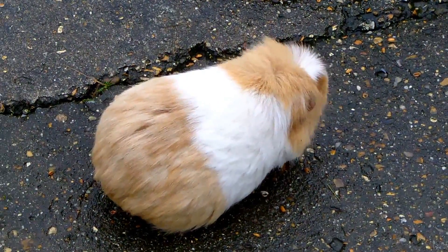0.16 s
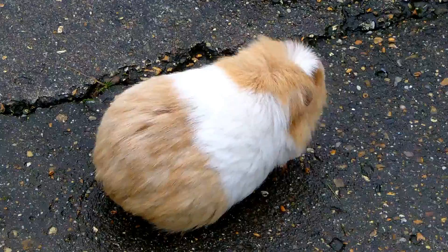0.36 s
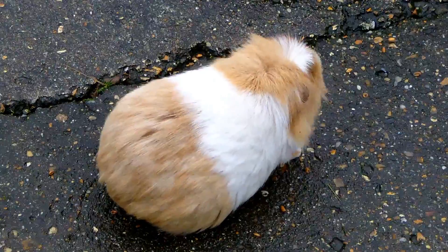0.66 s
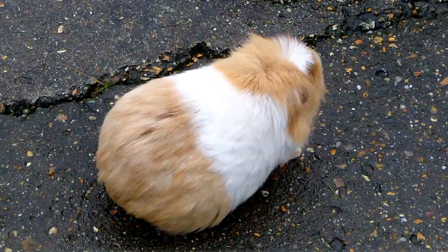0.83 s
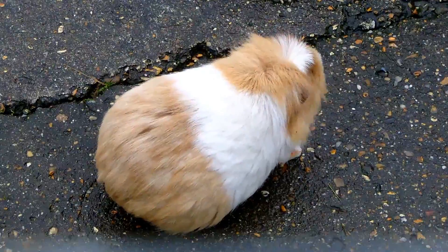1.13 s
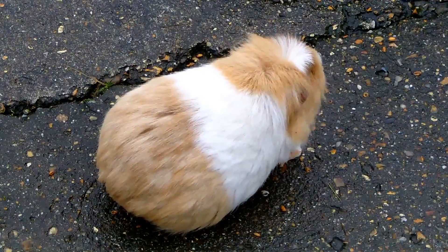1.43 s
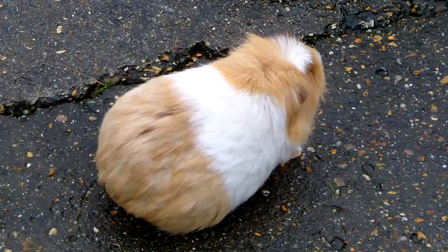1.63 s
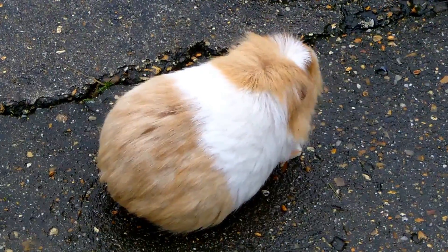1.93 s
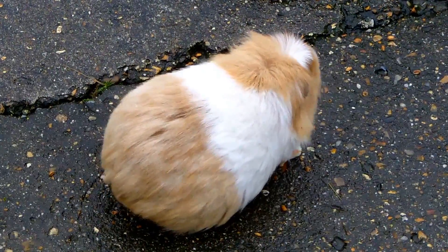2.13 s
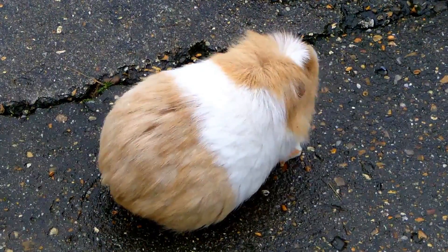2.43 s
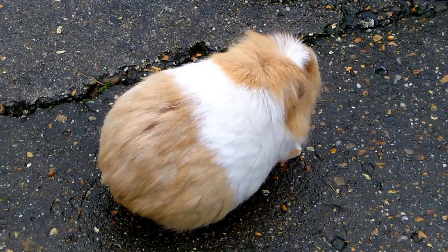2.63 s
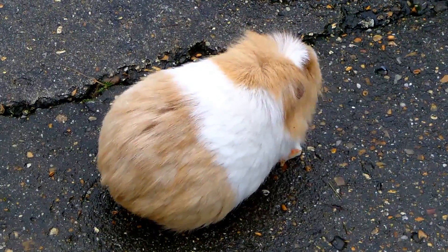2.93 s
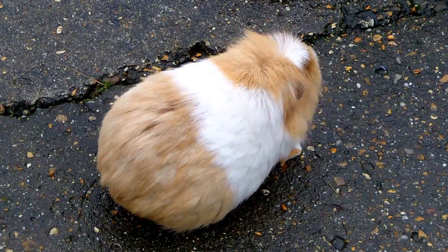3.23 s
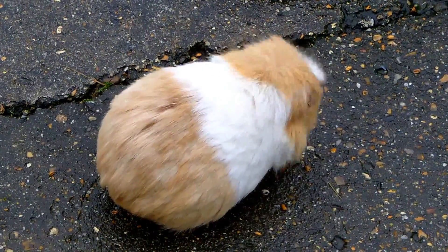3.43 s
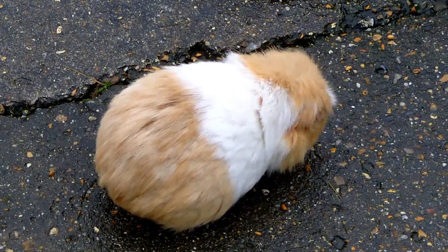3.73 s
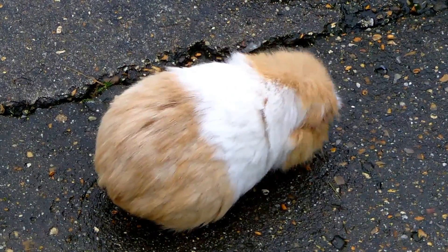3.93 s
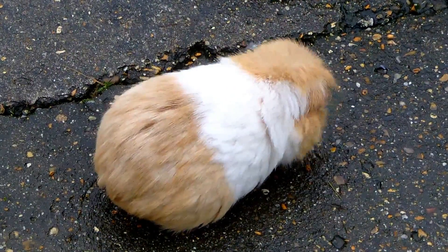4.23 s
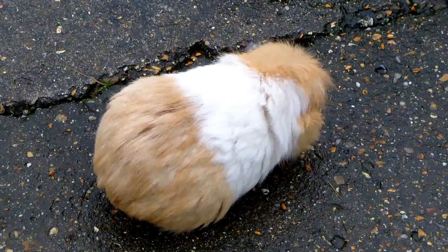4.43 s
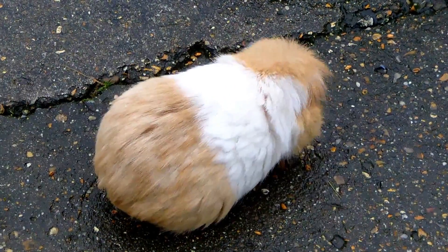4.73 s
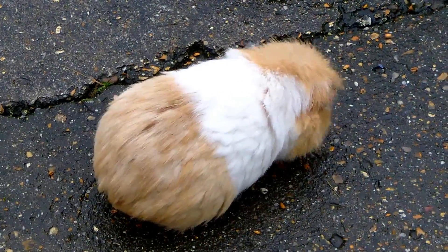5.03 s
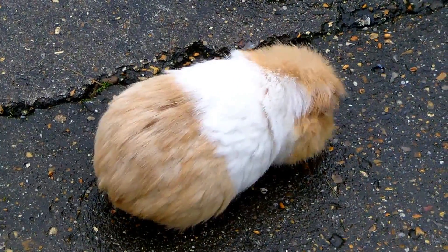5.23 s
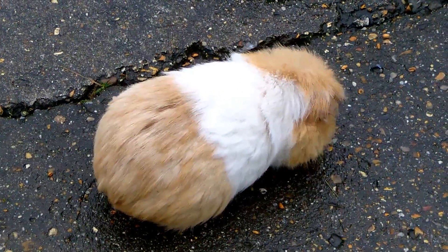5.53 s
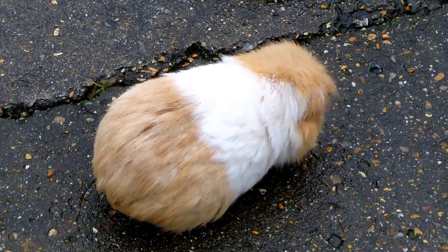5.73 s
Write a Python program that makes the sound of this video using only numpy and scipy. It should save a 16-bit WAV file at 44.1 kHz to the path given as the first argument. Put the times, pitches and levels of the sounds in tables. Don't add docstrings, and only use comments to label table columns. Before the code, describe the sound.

A guinea pig peeps and gives hoarse rising wheeks close by outdoors while wind thumps and crackles the microphone and a songbird repeats its phrase.

```python
import sys
import numpy as np
from scipy import signal
from scipy.fft import rfft, irfft
from scipy.io import wavfile
from scipy.ndimage import uniform_filter1d

SR = 44100
rng = np.random.default_rng(int(sys.argv[2]) if len(sys.argv) > 2 else 0)


def to_wav(sig):
    pcm = np.clip(np.atleast_2d(sig), -1, 1) * 32767
    pcm = np.round(pcm).astype(np.int16)
    wavfile.write(sys.argv[1], SR, pcm.T)


def gain_from_decibels(decibels):
    exponent = np.asarray(decibels, float) / 20
    return 10 ** exponent


N = 258867


def evened(x):
    return x / np.sqrt(np.mean(x ** 2) + 1e-20)


def add(mix, start_s, sound):
    part = mix[max(round(start_s * SR), 0):][:len(sound)]
    part += sound[:len(part)]


def coloured(points):
    f, db = np.transpose(points)
    hz = np.fft.rfftfreq(N, 1 / SR)
    shape = gain_from_decibels(np.interp(np.log(hz + 1), np.log(f), db))
    return evened(irfft(rfft(rng.standard_normal(N)) * shape, N))


def band(x, lo_hz, hi_hz):
    return signal.sosfilt(signal.butter(2, [lo_hz, min(hi_hz, 20000)], "band", fs=SR, output="sos"), x)


def wander(n, size):
    return evened(uniform_filter1d(uniform_filter1d(rng.standard_normal(n), size), size))


def tone(hz):
    return np.sqrt(2) * np.sin(2 * np.pi * np.cumsum(hz) / SR)


def echoes(x, t60_s, wet_db):
    t = np.arange(SR) / SR
    signs = rng.choice([-1., 1.], SR) * (rng.random(SR) < .04)
    taps = signs * gain_from_decibels(-60 * t / t60_s) * (t > .006)
    return x + gain_from_decibels(wet_db) * signal.fftconvolve(x, taps / np.linalg.norm(taps))[:N]


# pitch_hz, level_db (per Hz)
AIR = [(20, 9), (76, -5.5), (226, -23), (669, -7), (1730, -8.5), (4240, -9.5), (6210, -8.5), (8600, -4.5),
       (11600, -15), (15200, -13.5), (16200, -32)]


def air():
    return gain_from_decibels(-59.5 + .7 * wander(N, size=1500)) * coloured(AIR)


# start_s, level_db
BREEZE = [(0.0, -51), (.16, -72), (.88, -67), (1.06, -57.5), (1.3, -69.5), (1.629, -71), (1.86, -54.5),
          (2.14, -69), (3.377, -85.5), (3.47, -50.5), (3.7, -47.5), (4.18, -58), (4.58, -59), (4.8, -68.5),
          (5.05, -57), (5.4, -69), (5.65, -61.5), (5.87, -88)]
# pitch_hz, level_db (per Hz)
THUMP = [(40, -55), (90, -12.5), (200, 8), (480, 0), (800, -12.5), (1300, -16), (3000, -116)]
# start_s, thump_db
PUFFS = [(0.102, -51.5), (0.926, -55), (1.235, -48), (3.255, -56), (3.547, -33), (3.59, -36.5),
         (3.661, -49), (3.677, -37), (3.7, -49), (3.745, -35), (3.758, -35), (3.776, -35.5), (3.821, -37.5),
         (3.8444, -42), (3.874, -39), (3.915, -45), (3.953, -39.5), (4.081, -44), (4.0963, -38.5),
         (4.1685, -46), (4.206, -48), (4.389, -44.5), (4.45, -45), (4.542, -36.5), (4.5944, -49),
         (5.002, -47), (5.034, -47.5), (5.0565, -47), (5.1198, -43), (5.5625, -53.5)]
# start_s, thump_db, crackle_db (relative to the thump)
SLAPS = [(0.866, -43, -17.5), (0.897, -48, -8), (.993, -48, -15), (1.015, -50.5, -5.5),
         (1.0408, -38.5, -21), (1.16, -51.5, -3), (1.6686, -44, -13), (1.745, -53.5, -5), (1.8, -50, -17),
         (1.8485, -49, -19), (1.8993, -57, -1), (1.943, -51, -10), (1.983, -56, -6), (3.4208, -38.5, -13.5),
         (3.441, -33.5, -23), (3.891, -54, -6.5), (3.973, -36.5, -18.5), (4, -38, -24), (4.048, -57, -3),
         (4.192, -45, -18), (4.4134, -50, -7), (4.4866, -41, -15.5), (4.524, -48, -9), (4.5765, -45.5, -15),
         (4.676, -45.5, -6.5), (4.725, -45.5, -23), (4.7498, -50, 1), (4.951, -53, -12), (5.2073, -52.5, 1),
         (5.331, -47.5, -6.5)]


def wind():
    soft = [(*row, -41) for row in PUFFS]
    s, thump_db, crackle_db = np.transpose([*SLAPS, *soft])
    at = (s * SR).astype(int)
    puff = np.exp(-(np.arange(-900, 901) / SR / .0055) ** 2)
    push, slip = np.zeros((2, N))
    push[at] = gain_from_decibels(thump_db + 1.0)
    slip[at] = gain_from_decibels(thump_db + np.minimum(crackle_db, -2.5))
    breeze = gain_from_decibels(np.interp(np.arange(N) / SR, *np.transpose(BREEZE)) + 6.04 * wander(N, size=300))
    push = signal.oaconvolve(push, puff, "same") + breeze
    slip = signal.oaconvolve(slip, puff, "same") + gain_from_decibels(-16.5) * breeze

    flap = coloured(THUMP)
    flap /= np.sqrt(abs(uniform_filter1d(flap ** 2, size=350)) + .1)
    thumps = band(band(push * flap, 196, 3700), 210, 6400)
    slow_push = uniform_filter1d(push, size=1500) ** 0.57
    rumble = gain_from_decibels(-36.0) * slow_push * evened(band(flap, 63, 152.4))

    steps = -gain_from_decibels(4.0 * np.minimum(rng.exponential(1, N), 1.9)) * (rng.random(N) < 700 / SR)
    steps = band(steps, 200, 2700) + gain_from_decibels(-28) * band(steps, 1400, 17000)
    crackle = gain_from_decibels(6.5) * slip * evened(steps)

    pops = gain_from_decibels(3.5 * np.minimum(rng.exponential(1, N), 2.2)) * (rng.random(N) < 120 / SR)
    pops = band(pops, 900, 4000) + gain_from_decibels(-17) * band(pops, 4000, 15000)
    pops = .011 * np.tanh(gain_from_decibels(59) * uniform_filter1d(breeze, size=3000) * pops)
    return pops + rumble + thumps + crackle


# start_s, bright_db (peak), body_db (dull body relative to the bright peak)
SNAPS = [(0.0533, -39.5, -2.5), (0.0847, -46, -14), (0.998, -42, -7), (1.1702, -44, -10), (1.289, -51, -8),
         (1.4676, -47, 2), (1.5774, -45, -10), (1.7217, -40, -4), (1.7419, -50, -5), (1.7789, -45, -6),
         (1.824, -41, -9), (1.8652, -39, -13), (1.8971, -40.5, -2.5), (2.234, -48, -3), (2.9186, -42, -10),
         (3.1877, -50, -7), (3.4386, -51, -8), (3.4545, -39, -3), (3.4665, -37, -4), (3.5099, -38, -9),
         (3.5344, -40, -1), (3.5448, -47, -4), (3.6396, -37, -6), (3.7155, -48, 5), (3.7344, -40, -3),
         (3.758, -41, -1), (3.798, -35.5, -3.5), (3.8124, -42, -9), (3.8988, -38, -4.5), (3.924, -38, -13),
         (3.9659, -50, -9), (4.0023, -37.5, 1.5), (4.0487, -42, -3), (4.098, -34.5, -4.5), (4.116, -52, -9),
         (4.14, -46, -4), (4.1654, -53, 3), (4.1942, -42, -4), (4.2238, -51, -13), (4.2547, -39, -11),
         (4.3978, -47, 1), (4.4925, -45, -7), (4.54, -38, -5), (4.682, -40, -8), (4.7187, -55, -7),
         (4.732, -45, -14), (4.7501, -39, -5), (4.7634, -39, -5), (4.9322, -49, -4), (4.9565, -34.5, -7),
         (5.0095, -50, -5), (5.0504, -38, -14), (5.084, -39, -9), (5.2599, -41, -14), (5.2884, -46, -19),
         (5.2939, -30, -27), (5.3363, -44, -8), (5.359, -36, -9), (5.498, -38, -10)]


def snaps():
    bright, dull = np.zeros((2, N))
    t = np.arange(130) / SR
    tail = gain_from_decibels(-7) * np.exp(-t / 0.001)
    for s, db, body_db in SNAPS:
        crack = (t == 0) + rng.standard_normal(len(t)) * tail
        add(bright, s, gain_from_decibels(db + 6) * crack)
        add(dull, s, gain_from_decibels(db + body_db + 17.5) * crack)
    return band(bright, 6700, 15000) + gain_from_decibels(-4) * band(bright, 4600, 5900) + band(dull, 1100, 6300)


# start_s, level_db (peak), pitch_hz
KNOCKS = [(0.804, -47, 1520), (0.82, -44, 1010), (0.86, -47, 590), (0.895, -56, 600),
          (0.969, -61, 600), (0.971, -42.5, 1190), (1.01, -44, 610), (1.042, -37, 624),
          (1.074, -60, 1930), (1.098, -62, 1170), (1.138, -44, 2120), (1.197, -40, 2160),
          (1.408, -47, 1810), (1.444, -58, 2140), (1.461, -55, 2140), (1.665, -45, 684),
          (1.691, -46, 2050), (1.728, -46, 646), (1.743, -53, 1090), (1.774, -46, 659),
          (1.845, -40, 1192), (1.894, -51, 640), (1.927, -41, 960), (1.978, -56, 646),
          (2.025, -50, 1490), (2.135, -48, 1850),
          (3.417, -41, 724), (3.438, -48, 600), (3.455, -36.5, 1610), (3.507, -45, 2320),
               (3.544, -48, 600), (3.589, -46, 767), (3.638, -49, 2090), (3.651, -50, 1390),
               (3.673, -47, 627), (3.699, -47, 713), (3.732, -30, 600), (3.756, -32, 616),
               (3.813, -43, 829), (3.82, -40, 606), (3.876, -45, 2480), (3.876, -44, 600),
               (3.905, -43, 700), (3.97, -37, 613), (4.045, -59, 1130), (4.095, -43, 1030),
               (4.133, -47, 1050), (4.162, -43.5, 600), (4.189, -45, 705), (4.245, -52, 614),
               (4.324, -47, 743), (4.344, -46, 1360), (4.375, -40, 649), (4.409, -40, 1570),
               (4.436, -47, 600), (4.443, -51, 600), (4.487, -55, 600), (4.487, -45, 622),
               (4.518, -48, 643), (4.591, -49, 633), (4.674, -38, 616), (4.719, -51, 600),
               (4.719, -46, 635), (4.912, -54, 1580), (4.923, -44.5, 765), (4.953, -44, 1950),
               (4.971, -37, 1900), (5.03, -49, 2190), (5.055, -51, 2420), (5.081, -49, 2450),
               (5.12, -41, 2150), (5.161, -50, 2270), (5.188, -39, 2120), (5.305, -64, 1000),
               (5.325, -55, 600), (5.33, -50, 1170), (5.368, -40.5, 1240)]


def knocks():
    out = np.zeros(N)
    t = np.arange(130) / SR
    for s, db, hz in KNOCKS:
        add(out, s, -gain_from_decibels(db + 3.5) * np.cos(2 * np.pi * hz * t) * np.exp(-t * hz / 0.88))
    return band(out, 720, 5900)


# start_s, level_db, beak_db (lift above 2300 Hz)
RATTLE = [(5.5, -68, -16), (5.535, -52, -2), (5.58, -45.5, -6), (5.66, -47.5, 3), (5.762, -44.5, -1),
          (5.809, -88, -21)]
# pitch_hz, width_hz, level_db
RATTLE_THROAT = [(1200, 200, -15), (1720, 260, -3), (2020, 300, -1), (2730, 250, 1.5), (3300, 500, -6),
                 (4500, 900, -12), (5730, 800, -11), (6690, 450, -10), (8430, 700, -16)]
# start_s, pulses_per_s
RATTLE_RATE = [(5.5, 79.5), (5.605, 87.6), (5.72, 92.8), (5.81, 84)]


def rattle():
    s, db, beak_db = np.transpose(RATTLE)
    t = np.arange(s[0], s[-1], 1 / SR)
    rate = np.interp(t, *np.transpose(RATTLE_RATE)) * (1 + .006 * wander(len(t), size=300))
    turns = .76 + np.cumsum(rate) / SR
    puffs = np.exp(-(turns % 1) / .19) * rng.standard_normal(len(t))
    clicks = 7 * (np.diff(turns // 1, prepend=0) > 0)
    drive = puffs + clicks
    beak_db = np.interp(t, s, beak_db)
    throat = np.zeros(len(t))
    for hz, width, level_db in RATTLE_THROAT:
        delay_s = (hz - 2000) / 1000 * .0007
        ring = band(np.roll(drive, round(delay_s * SR)), hz - width / 2, hz + width / 2)
        throat += gain_from_decibels(level_db + beak_db * (hz > 2300)) * evened(ring)
    out = np.zeros(N)
    add(out, s[0], gain_from_decibels(np.interp(t, s, db)) * evened(throat))
    return echoes(out, .25, -9)


# start_s, level_db (peak), pitch_hz
TICKS = [(1.629, -49, 5400), (1.896, -58, 5460), (2.1438, -50, 5310), (2.3984, -57, 5480),
         (2.6569, -64, 5470), (2.9137, -54.5, 5360), (3.174, -62, 5500), (3.439, -52, 5500),
         (3.688, -51, 5500), (3.944, -57, 5080), (4.223, -62, 5300), (4.479, -59, 5330),
         (4.757, -50.5, 5345), (5.024, -59, 5300), (5.299, -55, 5150)]


def ticks():
    out = np.zeros(N)
    t = np.arange(round(0.017 * SR)) / SR
    for s, db, hz in TICKS:
        note = tone(hz - 3000 * (t - .008)) * signal.windows.tukey(len(t), .4)
        add(out, s - .001, gain_from_decibels(db + 2.0) * note)
    return echoes(out, .7, -9)


# start_s, level_db (peak), pitch_hz (centre)
BUZZES = [(1.125, -46, 4510), (1.3747, -45, 4545), (1.6476, -47.5, 4070), (1.917, -49.5, 4180),
          (2.1568, -43, 4166), (2.413, -47.5, 4155), (2.674, -49, 4230), (2.9327, -49, 4260),
          (3.1904, -49, 4140), (3.455, -51, 4430), (3.707, -51.5, 4160), (3.97, -46.5, 4133),
          (4.2427, -51.5, 4065), (4.506, -53.5, 4210), (4.553, -56, 4220), (4.613, -57, 4200),
          (4.771, -51, 4220), (4.7974, -58, 4154), (5.036, -49, 4170), (5.3096, -50, 4056)]


def buzzes():
    out = np.zeros(N)
    t = np.arange(round(.056 * SR)) / SR
    for s, db, hz in BUZZES:
        shake = 2 * np.pi * (232 * t + rng.random())
        pitch = hz + 50 - 1800 * t + 190 * np.sin(shake) + 30 * wander(len(t), size=200)
        swell = (1 + 0.57 * np.cos(shake)) * signal.windows.tukey(len(t), .55)
        swell = swell * gain_from_decibels(3.05 * wander(len(t), size=250))
        add(out, s - .003, gain_from_decibels(db - 4.0) * swell * (tone(pitch) + gain_from_decibels(-15.0) * tone(2 * pitch)))
    return echoes(out, 1.47, -3.0)


# start_s, level_db
SLURS = [(1.535, -61.5), (1.797, -59.5), (2.05, -58), (2.303, -58.5), (2.556, -65), (2.815, -61),
         (3.07, -60.5), (3.338, -65), (3.587, -64.5), (3.856, -56), (4.4, -66), (4.654, -65.5),
         (4.918, -62), (5.195, -61)]


def slurs():
    out = np.zeros(N)
    t = np.arange(round(.07 * SR)) / SR
    fall_hz = 2750 + 520 * np.exp(-t / 0.0165)
    for s, db in SLURS:
        level = gain_from_decibels(db + 2.3 * wander(len(t), size=250))
        add(out, s - .006, level * tone(fall_hz) * signal.windows.tukey(len(t), .4))
    return echoes(out, .9, -6)


# start_s, level_db (peak), pitch_hz
GRIT = [(0.5298, -40, 4470), (0.821, -43, 3630), (0.9723, -48, 2970), (2.9544, -46, 3050),
        (3.1411, -38.5, 6300), (3.715, -36, 3230), (4.166, -39, 2720), (4.8478, -36, 6470),
        (4.848, -49, 3000), (5.2344, -39, 8500), (5.455, -41, 3530), (5.455, -43, 8500), (5.615, -35, 8400)]


def grit():
    out = np.zeros(N)
    t = np.arange(130) / SR
    for s, db, hz in GRIT:
        add(out, s, gain_from_decibels(db) * np.sin(2 * np.pi * hz * t) * np.exp(-t * hz / 2.6))
    return out


def peep(start, end, from_hz, to_hz, db, octave_db, hoarseness):
    hz = np.linspace(from_hz, to_hz, round(max(end - start, .01) * SR))
    hz = hz * (1 + .004 * wander(len(hz), size=200))
    breath = 1 + hoarseness * wander(len(hz), size=90)
    voice = tone(hz) + gain_from_decibels(octave_db) * tone(2 * hz)
    return start, gain_from_decibels(db) * breath * voice * signal.windows.tukey(len(hz), .6)


# pitch_hz, width_hz, level_db
MOUTH = (2600, 200, 11)
# pitch_hz, level_db
THROAT = [(1600, -1.5), (2300, 2), (3600, 11), (4600, 6.5), (5400, 4), (6500, 4), (7600, 8.5), (9800, -1),
          (12000, -17)]


def wheek(rows, warble):
    s, *columns = np.transpose(rows)
    t = np.arange(s[0], s[-1], 1 / SR)
    n = len(t)
    hz, effort_db, strain_db = (np.interp(t, s, c) for c in columns)
    start, first, last, ends, hoarseness, share = warble
    turns = start + np.cumsum(np.linspace(first, last, n)) / SR
    depth = share * (ends + (1 - ends) * signal.windows.tukey(n, .8))
    bend = depth * (1 - 2 * abs(np.sin(np.pi * turns)) ** 2.4)
    warbled_hz = hz * (1 + bend + .007 * wander(n, size=60))
    f, throat_db = np.transpose(THROAT)
    mouth_hz, mouth_width_hz, mouth_peak_db = MOUTH
    out = np.zeros(n)
    for k in range(1, 6):
        db = effort_db + (k - 1) * strain_db + np.interp(np.log(k * hz), np.log(f), throat_db)
        db = db + mouth_peak_db / (1 + ((k * warbled_hz - mouth_hz) / mouth_width_hz) ** 2)
        db = db - (4.5 * (k > 2) - 3.5 * (k == 1)) * np.cos(2 * np.pi * turns)
        hoarse = 1 + hoarseness * wander(n, size=24)
        out += gain_from_decibels(db + 1.4 * wander(n, size=150)) * hoarse * tone(k * warbled_hz)
    return s[0], out * signal.windows.tukey(n, .08)


# start_s, pitch_hz, effort_db, strain_db (per partial)
WHEEKS = [
    [(1.05, 1830, -58, -6), (1.1, 2026, -67.5, 0), (1.165, 2424, -62.5, -3.5), (1.21, 2432, -57.5, -8.5),
     (1.275, 2402, -60.5, -3.5), (1.38, 2207, -71.5, -6)],
    [(1.385, 1587, -77.5, 4.5), (1.45, 1926, -59.5, -0.5), (1.52, 2242, -62, 0.5), (1.565, 2120, -64.5, 0),
     (1.62, 2070, -63, 0.5), (1.7, 2103, -63, -7)],
    [(2.2, 1777, -55, -7), (2.24, 1983, -73.5, 3.5), (2.28, 2098, -57, -3), (2.33, 2254, -62.5, -2),
     (2.4, 2083, -60.5, -1.5), (2.48, 2124, -81, 0)],
    [(3.385, 1783, -71.5, 2.5), (3.465, 2026, -62, -1.5), (3.511, 2324, -67.5, -1), (3.553, 2086, -62, -3),
     (3.6, 2176, -62.5, 1), (3.68, 2200, -84, -14)],
    [(4.96, 1730, -64, -2.5), (5.04, 2264, -60.5, 0.5), (5.084, 2330, -59, 0), (5.125, 2275, -57, -4),
     (5.17, 2267, -58.5, 1), (5.25, 2356, -68, -15)],
]
# start_turns, first_rate_per_s, last_rate_per_s, end_depth_share (0-1),
# hoarseness (0-1), depth (share of pitch)
WARBLES = [(.09, 70.5, 34, .2, .14, .064), (.3, 79, 70, .8, .33, .068), (.5, 84, 62, .4, .24, .055),
           (.47, 88, 60, .8, .4, .058), (.68, 68, 39, .3, .26, .055)]
# start_s, end_s, start_hz, end_hz, level_db
PEEPS = [(.03, 0.071, 1197, 1102, -57.5), (0.37, 0.418, 1062, 1390, -62), (0.409, 0.437, 1274, 1040, -61.5),
         (0.456, 0.626, 1206, 1133, -62), (.505, 0.542, 1262, 975, -57), (0.602, 0.824, 1160, 1080, -67.5),
         (0.788, 0.842, 1083, 953, -64), (1.09, 1.132, 1227, 1097, -58.5),
         (1.495, 1.659, 1210, 1162, -58.5), (1.774, 1.835, 1345, 1210, -62),
         (2.53, 2.675, 1189, 1103, -66.5), (3.26, 3.283, 1107, 1360, -60.5),
         (3.284, 3.312, 1380, 1096, -62), (5.211, 5.255, 1460, 1125, -65.5),
         (5.316, 5.386, 1250, 1054, -62)]
# start_s, end_s, start_hz, end_hz, level_db
WHISTLES = [(0.0, 0.19, 3600, 3440, -67), (0.0, 0.039, 2280, 2160, -61.5), (0.122, .163, 2170, 2240, -68),
            (0.361, 0.41, 5800, 5270, -61.5), (1.301, 1.35, 4480, 4280, -49.5),
            (1.33, 1.67, 4490, 3440, -63), (2.6, 2.625, 3770, 3200, -62), (2.625, 2.75, 3720, 3600, -61),
            (2.515, 2.6, 4460, 5100, -63), (2.515, 2.56, 1805, 2050, -64), (3.275, 3.3, 1785, 1950, -64.5),
            (5.47, 5.6, 4260, 3200, -63), (2.624, 2.84, 7300, 7600, -68), (2.678, 2.76, 2220, 2280, -63),
            (2.762, 2.806, 2350, 2120, -63), (2.879, 2.83, 2360, 2190, -60.5),
            (2.916, 2.95, 5230, 4800, -62), (5.825, 5.86, 4815, 4420, -57.5),
            (5.825, 5.866, 5196, 5070, -64)]


def guinea_pig():
    out = np.zeros(N)
    for rows, warble in zip(WHEEKS, WARBLES):
        add(out, *wheek(rows, warble))
    for row in PEEPS:
        octave_db = -1 if row[1] - row[0] > .1 else -16
        add(out, *peep(*row, octave_db, hoarseness=.2))
    for row in WHISTLES:
        add(out, *peep(*row, octave_db=-16, hoarseness=.45))
    return echoes(out, .25, -7.5)


def scene():
    songbird = ticks() + buzzes() + slurs()
    membrane = wind() + snaps() + knocks()
    return (air() + membrane + rattle() + songbird + grit() + guinea_pig())[None]


# start_s, length_ms
CHOKES = [(0.297, 6.9), (0.4536, 3.9), (0.8629, 5.4), (0.9029, 9.1), (1.1579, 2.8), (1.6654, 2.7),
          (1.7116, 5.1), (1.8006, 6.2), (1.844, 1.7), (1.9213, 4), (1.98, 2.4), (3.423, 16.2),
          (3.4614, 5.1), (3.4698, 1.1), (3.473, 4.6), (3.537, 8.4), (3.5907, 4.5), (3.786, 5), (3.9533, 14),
          (3.9742, 0.71), (3.99, 0.37), (4.414, 11.5), (4.4824, 6.1), (4.6722, 3.4), (5.122, 1.7),
          (5.327, 5)]


def choked_input(dry):
    low_db = 10 * np.log10(abs(uniform_filter1d(band(dry[0], 110, 275) ** 2, size=3000)) + 1e-12)
    gate = gain_from_decibels(-.2 * np.maximum(low_db + 57, 0))
    for s, ms in CHOKES:
        gate[round(s * SR):round((s + ms / 1000) * SR)] *= gain_from_decibels(-33)
    return dry * uniform_filter1d(gate, size=9)


# pitch_hz, width_hz
NOTCHES = [(298, 132), (903, 107)]


def hum_traps(x):
    for hz, width in NOTCHES:
        x = signal.lfilter(*signal.iirnotch(hz, hz / width, SR), x)
    return x


def top_cut(x):
    return signal.sosfilt(signal.butter(12, 16810, fs=SR, output="sos"), x)


def record(dry):
    x = hum_traps(choked_input(dry))
    low_pass = signal.firwin(511, 15950, window=("kaiser", 9), fs=SR)
    mix = signal.oaconvolve(x, low_pass[None], "same")
    return top_cut(mix)


dry = scene()
out = record(dry)
to_wav(out)
```